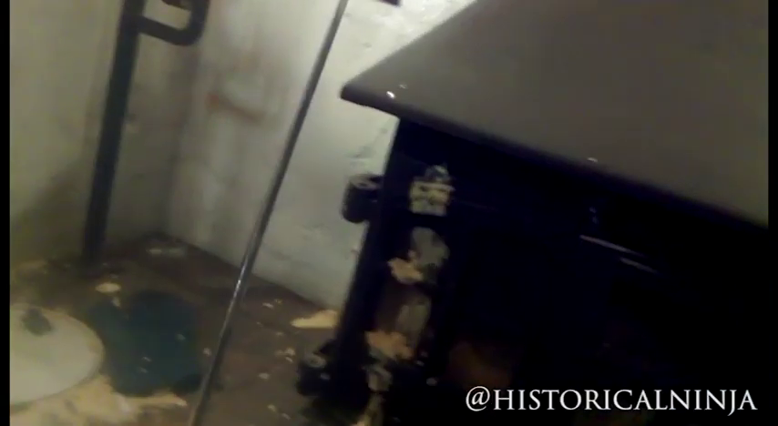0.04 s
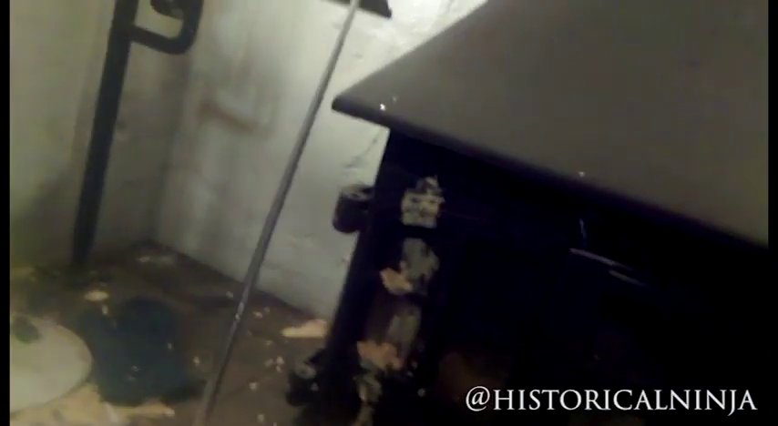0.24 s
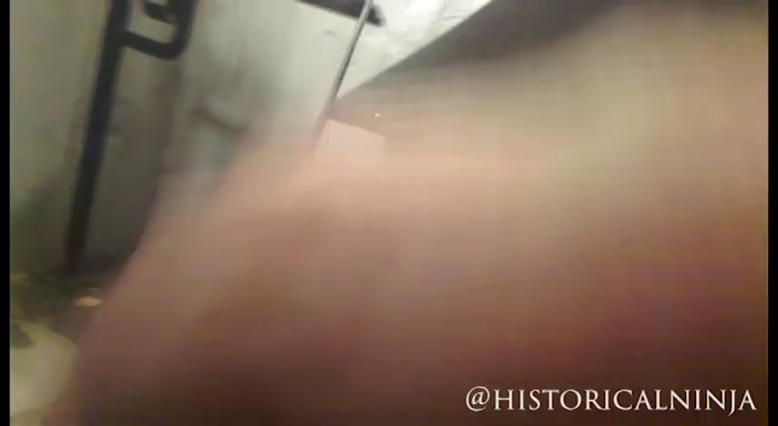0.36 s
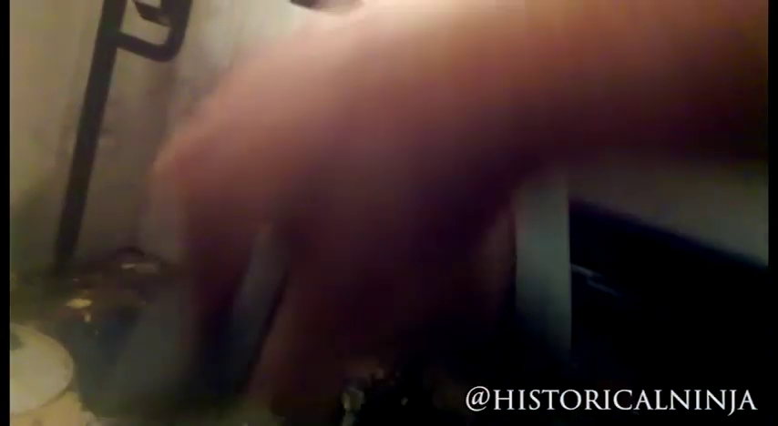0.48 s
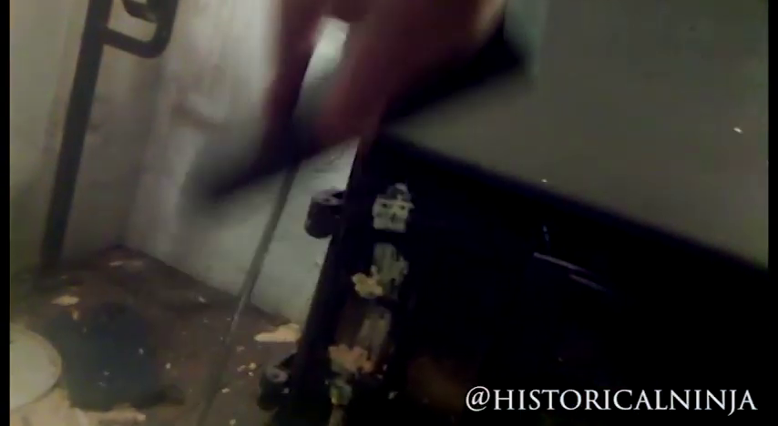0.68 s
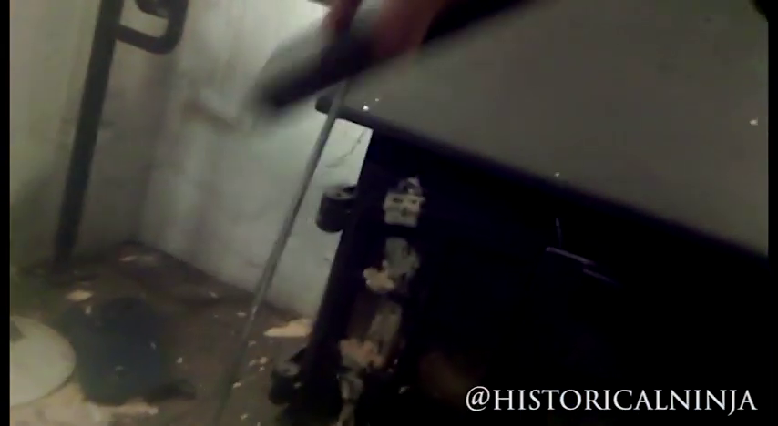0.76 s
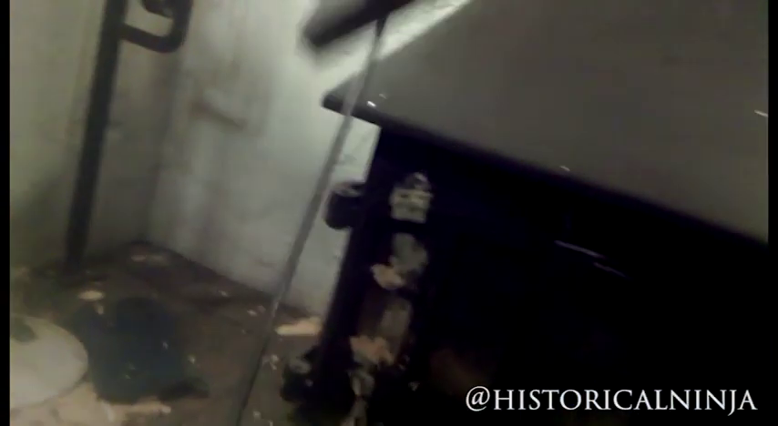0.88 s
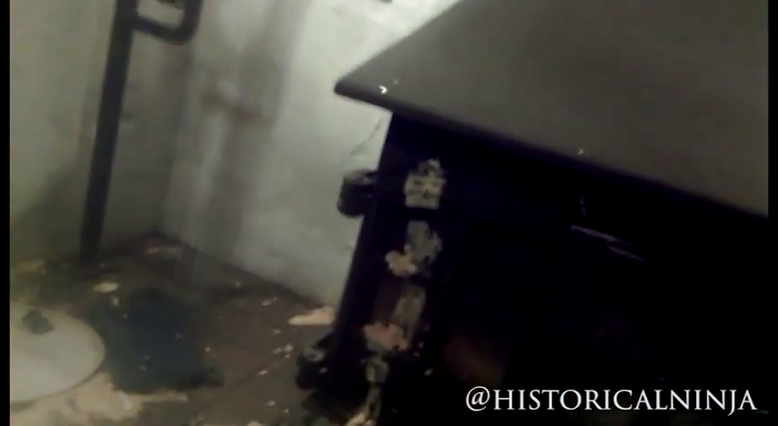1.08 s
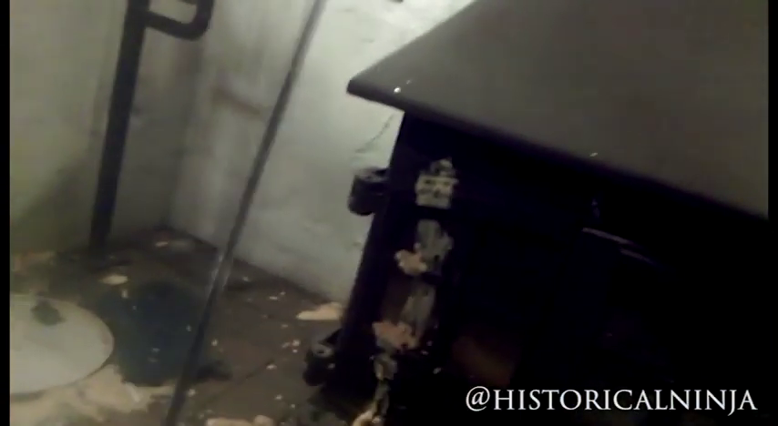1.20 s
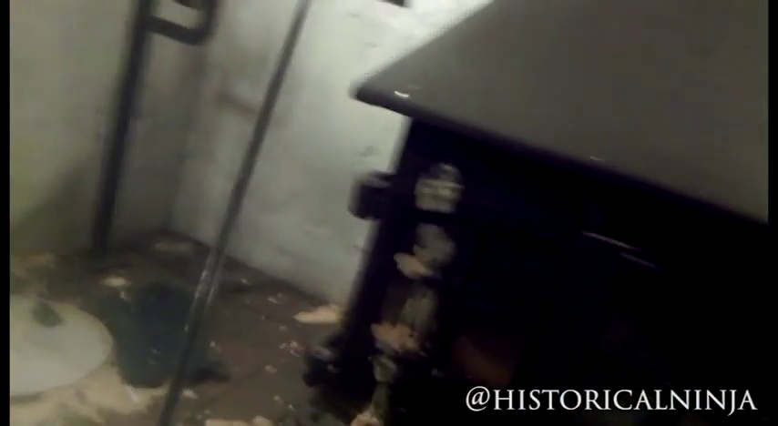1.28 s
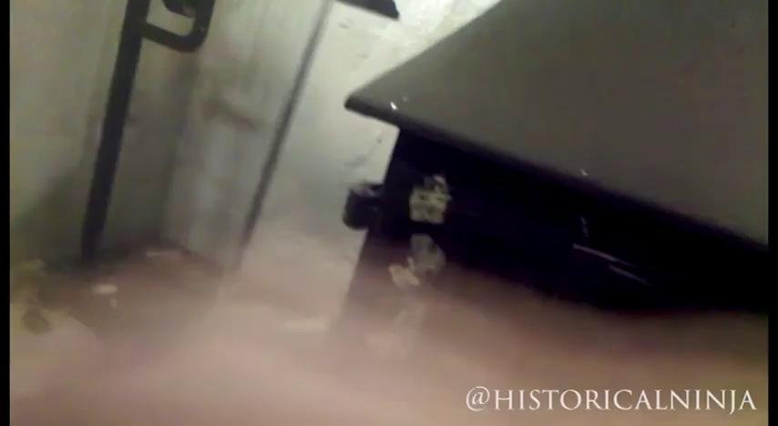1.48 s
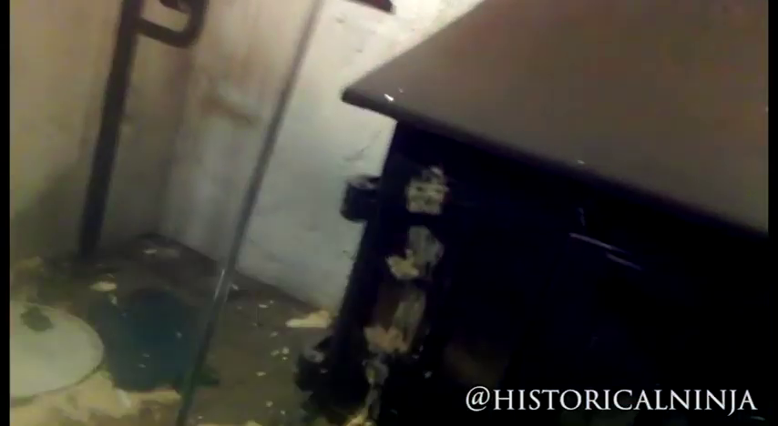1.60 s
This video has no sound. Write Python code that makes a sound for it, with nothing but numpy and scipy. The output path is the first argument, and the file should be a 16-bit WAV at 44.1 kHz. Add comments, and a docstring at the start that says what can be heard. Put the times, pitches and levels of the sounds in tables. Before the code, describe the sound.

One bright, rasping scrape of steel on a thin blade begins with a tap, judders with tiny squeaks and ends in a short ringing clatter. It is close to the microphone, on the left, over faint room hiss.

```python
"""A small, quiet room: a steel tool lands on a long thin blade, rasps along it in one stroke and
clatters off the end, close by on the left. Grit in the contact rings both pieces of steel, a few
resonances glide as the tool travels, and here and there one mode catches and squeaks.
Underneath lie faint room hiss and the rumble of a hand holding a camera."""
import sys
import numpy as np
from scipy import signal
from scipy.fft import rfft, irfft
from scipy.io import wavfile

SR = 44100
rng = np.random.default_rng(int(sys.argv[2]) if len(sys.argv) > 2 else 0)


def digitize_waveform(pressure):
    """Quantize a signal to 16-bit integers and store it at the path in sys.argv[1].

    Rows of a 2-D input are taken as channels; values are limited to [-1, 1].
    """
    field = np.atleast_2d(pressure).T
    bounded = np.clip(field, -1, 1)
    quanta = np.round(bounded * 32767).astype(np.int16)
    wavfile.write(sys.argv[1], SR, quanta)


N = 72765
T = np.arange(N) / SR

# low and high modes of the steel: f/Hz, width/Hz, relative level/dB
LOW_STEEL_MODES = [(1783,45,-11),(1995,70,-5),(2120,40,-1),(2215,30,2),(2561,50,-9)]
HIGH_STEEL_MODES = [(2716,42,-13),(2915,70,-9),(3066,38,-1),(3577,70,-15),(4125,70,-11),(4407,60,-11),(5089,25,-13),(5153,30,-12),(5360,35,-14),(5715,70,-15),(6060,45,-13),(6271,60,-11),(6855,45,-9),(7640,35,-12),(7735,35,-11),(8013,40,-9),(8495,65,-9),(9100,60,-9),(9268,60,-8),(9825,30,-12),(10122,55,-1),(10585,65,-9),(10922,55,0),(11060,45,-8),(11375,60,-6),(11722,55,-2),(12573,50,-16),(13480,80,-11),(14303,60,-18)]
# rasp between the modes: f/Hz, relative level/dB
RASP_SPECTRUM = [(200,-29),(1000,-13.5),(1600,-12),(2500,5.5),(3600,2),(5500,0.5),(7200,-8.5),(9000,7),(11000,4.5),(12800,1.5),(14200,-3.5),(16000,-7.5)]


def scrape():
    """The stroke: friction rings the steel and grinds the blade in its support as the tool judders."""
    # treble from the edge biting: t/s, level/dB
    bite = [(.232,-74),(.24,-47),(.282,-48),(.294,-40),(.304,-46),(.336,-43.5),(.366,-38),(.385,-34.5),(.478,-29),(.525,-33),(.552,-40.5),(.59,-32),(.608,-32.5),(.626,-29.5),(.656,-36.5),(.674,-33),(.74,-30.5),(.82,-35),(.858,-31),(.88,-38.5),(.906,-28.5),(.968,-36.5),(.994,-32),(1.024,-37),(1.074,-40),(1.092,-32),(1.125,-42.5),(1.15,-39.5),(1.158,-29),(1.184,-31.5),(1.192,-56)]
    # pressure on the blade: t/s, level/dB
    pressure = [(.232,-60),(.24,-37),(.275,-48),(.298,-37.5),(.33,-40),(.38,-35),(.41,-33),(.48,-38),(.52,-39.5),(.56,-45.5),(.59,-35),(.63,-43.5),(.66,-40),(.73,-32.5),(.785,-31),(.84,-42.5),(.86,-35.5),(.884,-37.5),(.905,-34.5),(.955,-39.5),(.995,-34),(1.045,-31.5),(1.075,-49),(1.13,-33),(1.183,-40),(1.192,-64.5)]
    # tone of the grinding: f/Hz, relative level/dB
    grind_spectrum = [(60,-27),(150,-16.5),(280,-9.5),(480,-29.5),(610,4),(720,-6.5),(900,-3.5),(1100,-1),(1250,2),(1550,2.5),(1900,-10),(2400,-9),(3500,-12.5)]
    # swell of the grinding: t/s, level/dB
    grind_swell = [(.24,-49.5),(.33,-52),(.42,-65),(.55,-61.5),(.6,-49),(.8,-42),(1,-40),(1.08,-50),(1.16,-47.5),(1.19,-58.5)]
    # gliding blade resonances, one curve each: t/s, f/Hz, level/dB
    glide_curves = [
        [(.24,203.4,-72),(.62,229,-69.5),(.74,253,-62.5),(.86,322,-61.5),(.96,365,-57),(1.1,350,-76.5),(1.19,360,-75)],
        [(.24,620,-71),(.33,644,-64.5),(.43,765,-58.5),(.52,770,-66.5),(.565,760,-57),(.62,850,-53),(.67,962,-48.5),(.73,1040,-48),(.84,922,-53.5),(.92,900,-63.5),(1.01,896,-44.5),(1.06,1023,-55),(1.19,910,-71)],
        [(.24,1360,-61),(.33,1443,-56.5),(.42,1600,-45),(.5,1565,-45),(.56,1650,-53),(.59,1540,-75),(.66,1450,-49),(.75,1220,-50),(.83,1340,-47.5),(.9,1360,-45.5),(1,1333,-50.5),(1.08,1500,-49.5),(1.14,1360,-50.5),(1.19,1290,-62)],
    ]
    sheen = rub(HIGH_STEEL_MODES)
    rasp = amp(-6) * unit(colour(friction(), RASP_SPECTRUM))
    treble = amp(3.5) * (sheen + rasp) * envelope(bite)
    body = amp(-2) * rub(LOW_STEEL_MODES) * envelope(pressure)
    grind = amp(-2.5) * unit(colour(friction(), grind_spectrum)) * envelope(grind_swell)
    glides = sum(glide(curve) for curve in glide_curves)
    judder = amp(1.1 * wander(hz=80))
    return (treble + body + grind + glides) * judder


def friction(grains_per_s=6000, spread_db=2.5, chatter_db=1.8):
    """Dense tiny impacts over smooth sliding noise, clumped by chatter."""
    grains = (rng.random(N) < grains_per_s / SR) * rng.choice([-1, 1], N)
    grit = grains * amp(spread_db * np.minimum(rng.exponential(1, N), 4))
    slide = .5 * rng.standard_normal(N)
    chatter = amp(chatter_db * wander(hz=110))
    return unit((unit(grit) + slide) * chatter)


def rub(modes, flare_db=2.3):
    """Rubbed modes flare and fade at random, as when the contact passes their antinodes."""
    ringing = np.zeros(N)
    for hz, width, db in modes:
        flare = flare_db * np.clip(wander(hz=18), -2, 2)
        ringing += amp(db + flare) * resonate(friction(), hz, width)
    return unit(ringing)


def glide(curve):
    """One resonance of the blade, retuned by the moving contact."""
    times, hz, _ = np.transpose(curve)
    return unit(resonate(friction(), np.interp(T, times, hz), width_hz=38)) * envelope(curve)


def squeaks(waver_depth=0.0089):
    """Stick and slip locks briefly onto one mode: a wavering tone that swells and fades."""
    # catches of the edge: centre t/s, half length/s, f/Hz, peak rms level/dB
    catches = [(0.3,0.0032,10080,-38.5),(0.309,0.03,2092,-44),(0.371,0.018,10200,-37.5),(0.463,0.022,5105,-37.5),(.488,0.012,3072,-20),(0.478,0.024,8010,-31),(0.853,0.0071,10920,-26.5),(0.987,0.02,1777,-39.5),(1.046,0.017,3078,-37),(1.093,0.0048,11730,-23.5)]
    tones = np.zeros(N)
    for centre, half_length, hz, db in catches:
        cycles = np.cumsum(hz * (1 + waver_depth * wander(hz=170))) / SR
        swell = amp(db) * np.exp(-.5 * ((T - centre) / half_length) ** 2)
        tones += swell * np.sqrt(2) * np.sin(2 * np.pi * cycles)
    return tones


def knocks(crunch_decay_s=0.0004, tick_db=-9.5, low_cut_hz=110):
    """Short gritty blows shake the blade and ring the steel."""
    # landing, two snags, clatter at the tip: t/s, thud/dB, low ring/dB, high ring/dB, free ring/dB
    hits = [(0.2338,-3,-17,-12,-26),(.2358,-10,-16,-12,-33.5),(0.909,-24,-15,-2,-20),(.941,-29,-17,-6.5,-27.5),(1.164,-15.5,-22,-11,-4),(1.1725,-16,-24,-0.5,-6.5),(1.178,-21,-20,1.5,-9.5),(1.1836,-15.5,-18.5,0.5,-10)]
    # modes of the blade in its support: f/Hz, width/Hz, relative level/dB
    thud_modes = [(120,60,-22),(215,70,-17),(330,70,-14),(440,70,-10),(528,35,-8),(680,80,-10),(900,200,-9),(1130,100,-7),(1278,45,-1),(1870,40,-1),(1990,60,4),(2086,12,14)]
    # modes of the blade as its tip springs free: f/Hz, width/Hz, relative level/dB
    free_modes = [(1272,30,3),(1965,35,-1),(2712,22,1),(3064,10,-3),(4400,50,-1),(5045,30,-3),(6056,22,1),(7630,35,-1),(10905,45,6)]
    clatter = np.zeros(N)
    for start, thud_db, low_db, high_db, free_db in hits:
        blow = signal.unit_impulse(N, round(start * SR))
        crunch = rng.standard_normal(N) * (T >= start) * np.exp(-abs(T - start) / crunch_decay_s)
        crunch /= np.linalg.norm(crunch)
        tick = amp(tick_db) * colour(crunch, RASP_SPECTRUM)
        clatter += amp(thud_db) * ring(blow, thud_modes)
        clatter += amp(low_db) * ring(blow, LOW_STEEL_MODES)
        clatter += amp(free_db) * ring(blow, free_modes)
        clatter += amp(high_db) * (ring(crunch, HIGH_STEEL_MODES) + tick)
    return signal.sosfilt(signal.butter(2, low_cut_hz, "high", fs=SR, output="sos"), clatter)


def room(source, predelay_s=.003):
    """Direct sound, mostly on the left, and the short tail of the walls."""
    # decay of the room: f/Hz, t60/s
    decay_times = [(100,0.291),(500,0.25),(2000,0.26),(5000,.25),(10000,0.24),(15000,0.11)]
    # tail against the direct sound: f/Hz, level/dB
    wet_eq = [(100,-14.5),(600,-8),(1500,-7.5),(3000,-7.5),(6000,-5),(12000,-7)]
    # direct sound on the right against the left: f/Hz, level/dB
    right_direct_eq = [(100,-3),(500,-4),(800,-5.5),(1250,-26.5),(2000,-21),(5500,-26.5),(9000,-29.5),(15000,-17.5)]
    # tail on the right against the left: f/Hz, level/dB
    right_wet_eq = [(100,8),(700,5.5),(1250,-4),(2000,-15),(5500,-7.5),(9000,-8.5),(15000,-25.5)]
    reflections = rng.standard_normal((2, N)) * (rng.random((2, N)) < .1) * (T > predelay_s)
    hz, t, bands = signal.stft(mono_bass(reflections, below_hz=900), SR, nperseg=256)
    decay = amp(-60 * t / value_at(decay_times, hz)[:, None])
    tail = signal.istft(bands * decay, SR, nperseg=256)[1][:, :N]
    tail /= np.linalg.norm(tail[0])
    reverb = signal.fftconvolve(source[None], tail, axes=1)[:, :N]
    wet_left, wet_right = colour(reverb, wet_eq)
    right = colour(source, right_direct_eq) + colour(wet_right, right_wet_eq)
    return np.array([source + wet_left, right])


def background(hiss_db=-68.5):
    """Faint room hiss and the rumble of the hand on the camera."""
    # room tone: f/Hz, relative level/dB
    hiss_spectrum = [(20,0.5),(120,-3.5),(250,-2.5),(600,-10),(1500,-14.5),(2600,-13),(5000,-21.5),(10000,-17.5),(16000,-25)]
    # handling rumble: f/Hz, relative level/dB
    rumble_spectrum = [(15,-25.5),(30,-12.5),(44,-9),(60,-3),(90,-18),(200,-26),(600,-70)]
    # rise and fall of the rumble: t/s, level/dB
    handling = [(0,-58.5),(.2,-67),(.235,-60),(.3,-65.5),(.45,-61),(.56,-66),(.65,-60),(.78,-65.5),(1,-63.5),(1.27,-67),(1.35,-69),(1.49,-83.5),(1.525,-65.5),(1.61,-63),(1.65,-67.5)]
    hiss = colour(mono_bass(rng.standard_normal((2, N)), below_hz=1000), hiss_spectrum)
    rumble = colour(mono_bass(rng.standard_normal((2, N)), below_hz=110), rumble_spectrum)
    return amp(hiss_db) * unit(hiss) + unit(rumble) * envelope(handling)


def resonate(drive, hz, width_hz):
    """A resonance whose pitch can follow a curve."""
    carrier = np.exp(2j * np.pi * np.cumsum(hz * np.ones(N)) / SR)
    pole = np.exp(-np.pi * width_hz / SR)
    return 2 * (carrier * signal.lfilter([1 - pole], [1, -pole], drive / carrier + 1e-18)).real


def ring(drive, modes):
    """Rings a set of damped modes, keeping the energy of a white drive."""
    t = T[:SR // 3]
    body = np.zeros_like(t)
    for hz, width, db in modes:
        gain = rng.choice([-1, 1]) * amp(db) * width
        body += gain * np.exp(-np.pi * width * t) * np.sin(2 * np.pi * hz * t)
    return signal.fftconvolve(drive, body / np.linalg.norm(body))[:N]


def mono_bass(stereo, below_hz):
    """Makes two unrelated channels alike in the bass."""
    left, right = rfft(stereo)
    shared = rolloff(below_hz)
    return irfft([left, shared * left + np.sqrt(1 - shared ** 2) * right], N)


def wander(hz):
    """Random drift up to about the given rate, at rms 1."""
    return unit(irfft(rfft(rng.standard_normal(N)) * rolloff(hz), N))


def rolloff(hz):
    """Low-pass gain for each frequency bin."""
    return 1 / (1 + (np.fft.rfftfreq(N, 1 / SR) / hz) ** 4)


def colour(x, spectrum):
    """Equalises by a curve in dB."""
    gain = amp(value_at(spectrum, np.fft.rfftfreq(2 * N, 1 / SR)))
    return irfft(rfft(x, 2 * N) * gain)[..., :N]


def value_at(points, hz):
    """Reads a curve on a log-frequency axis."""
    freqs, values = np.transpose(points)
    return np.interp(np.log(hz + 1), np.log(freqs + 1), values)


def envelope(points):
    """Gain over time from a dB curve, silent outside it."""
    rows = np.array(points)
    return amp(np.interp(T, rows[:, 0], rows[:, -1], left=-np.inf, right=-np.inf))


def amp(db):
    """Decibels to gain."""
    return 10 ** (np.asarray(db) / 20)


def unit(x):
    """Scales to rms 1."""
    return x / np.sqrt(np.mean(x ** 2) + 1e-20)


def scene():
    """Scrape, squeaks and knocks in the room, over the background."""
    return room(scrape() + squeaks() + knocks()) + background()


def record(dry, cutoff_hz=15800):
    """A steep low-pass trims the very top."""
    lowpass = signal.firwin(511, cutoff_hz, window=("kaiser", 9), fs=SR)
    return signal.oaconvolve(dry, lowpass[None], "same")


dry = scene()
out = record(dry)
digitize_waveform(out)
```